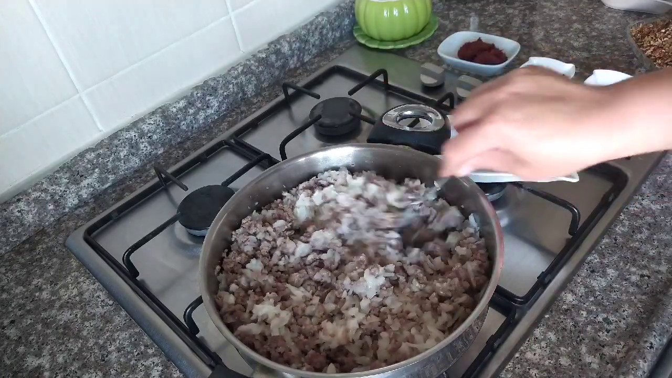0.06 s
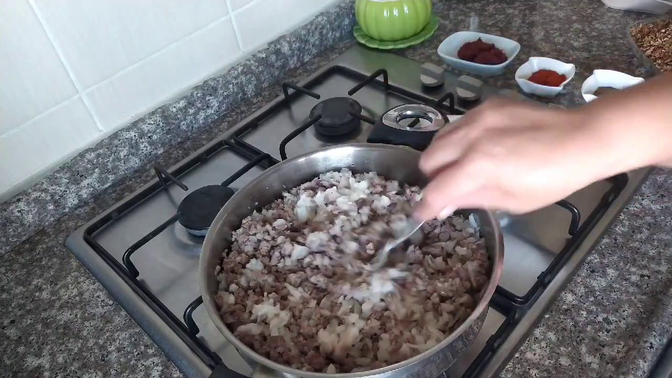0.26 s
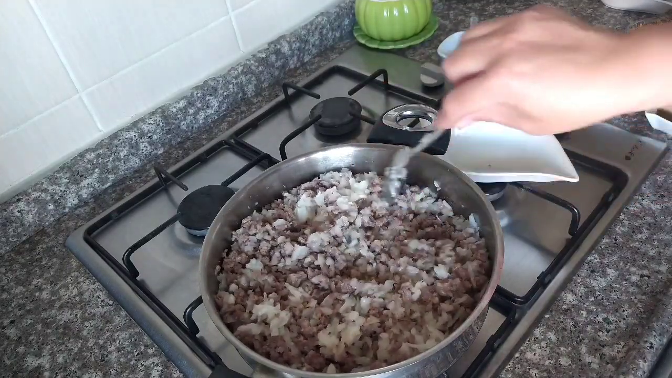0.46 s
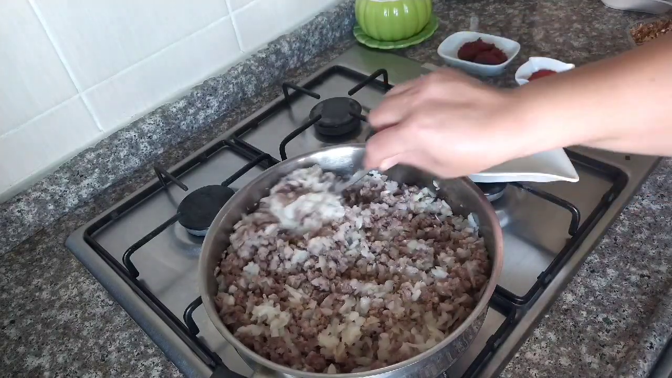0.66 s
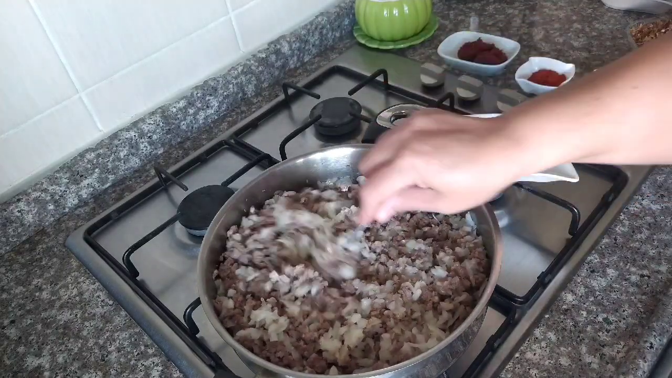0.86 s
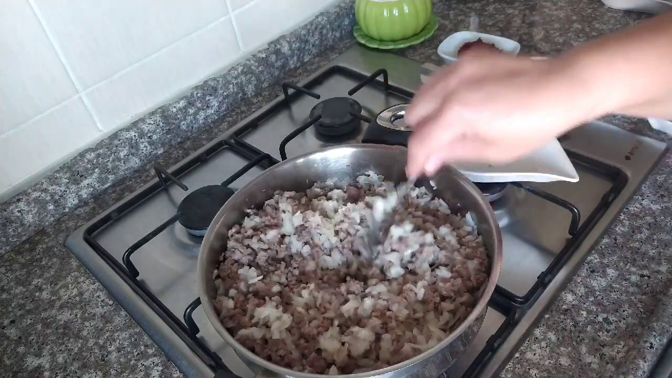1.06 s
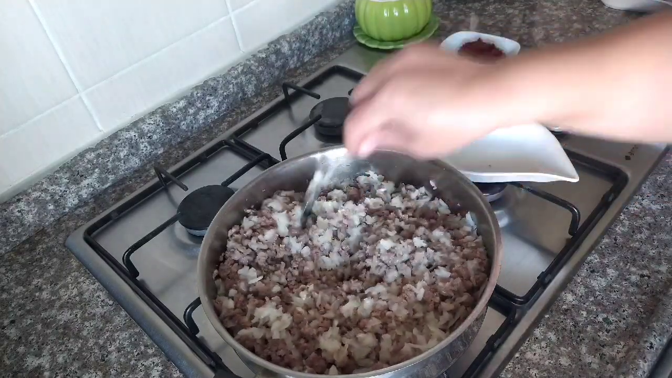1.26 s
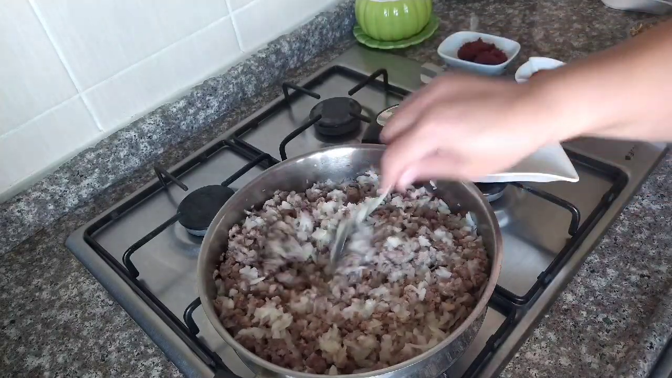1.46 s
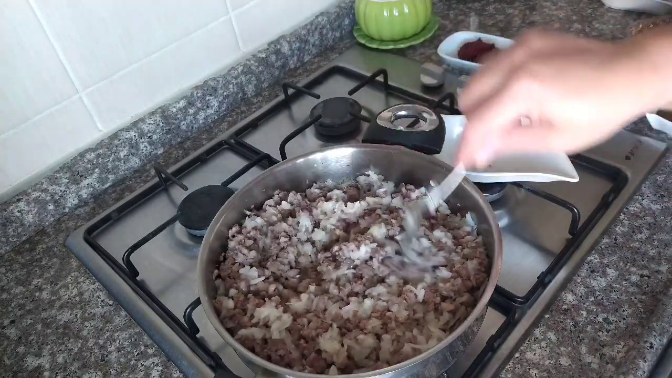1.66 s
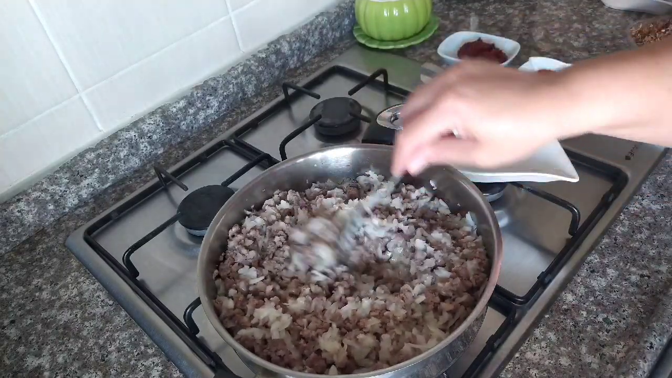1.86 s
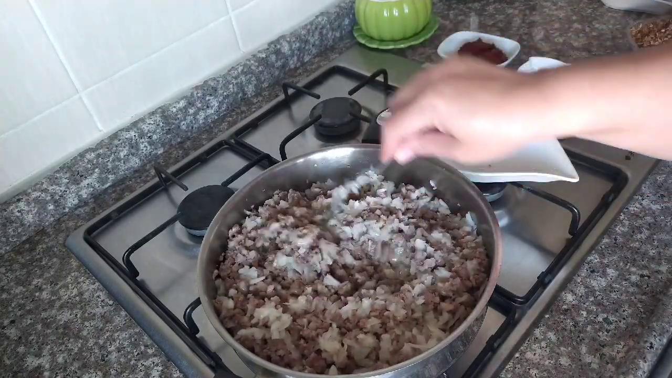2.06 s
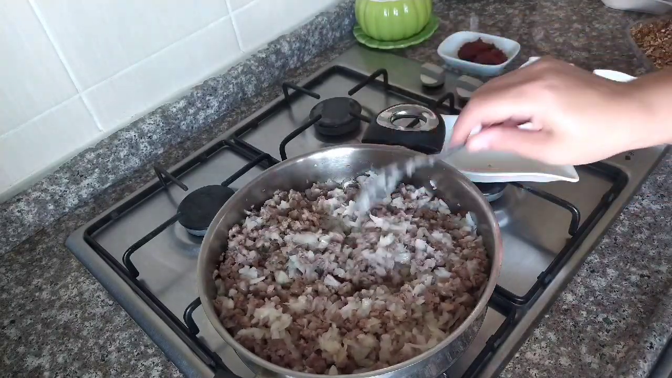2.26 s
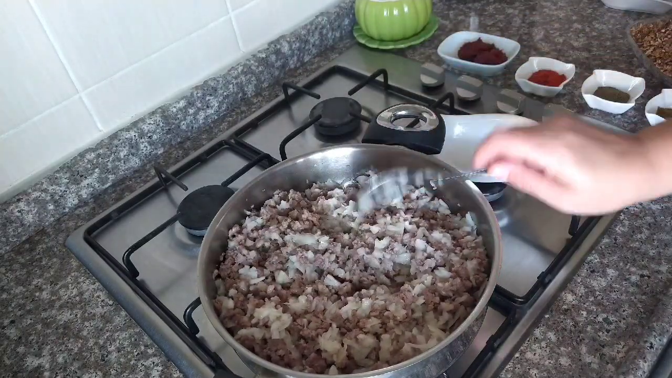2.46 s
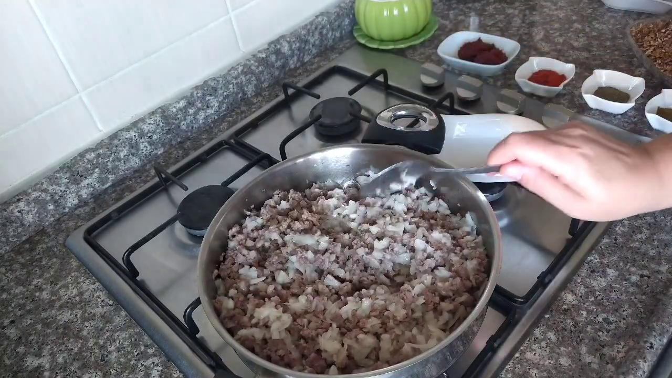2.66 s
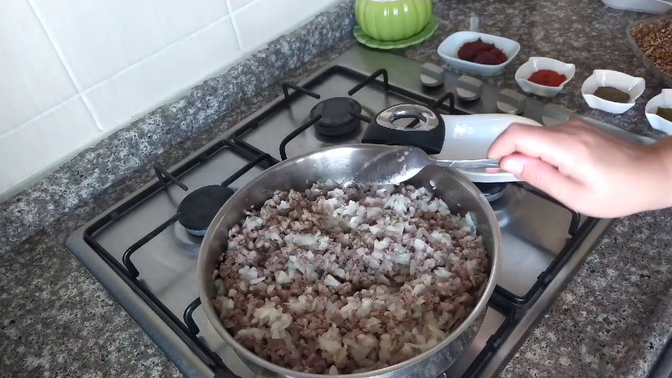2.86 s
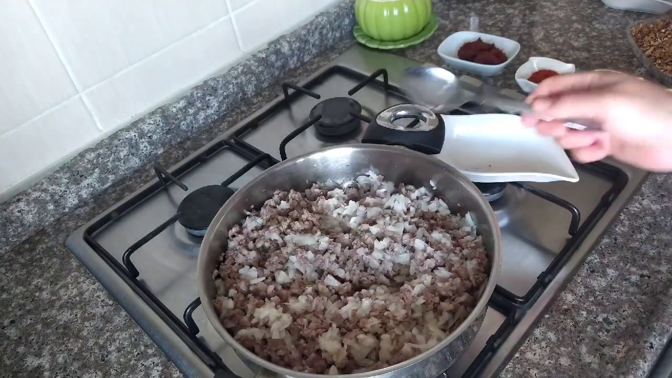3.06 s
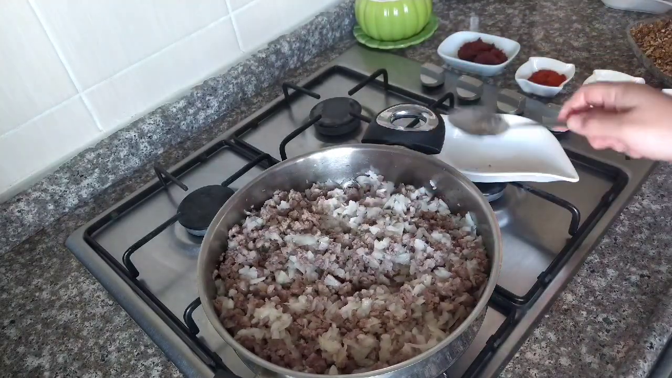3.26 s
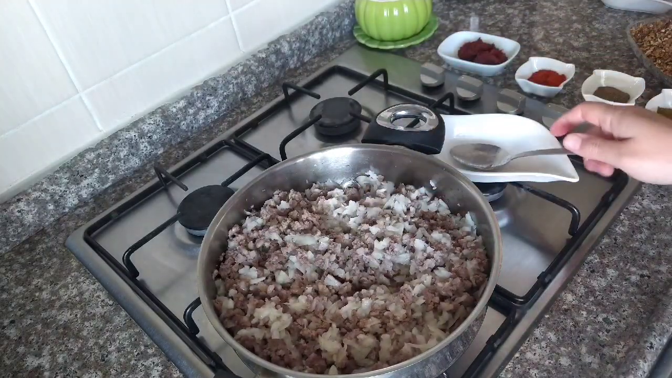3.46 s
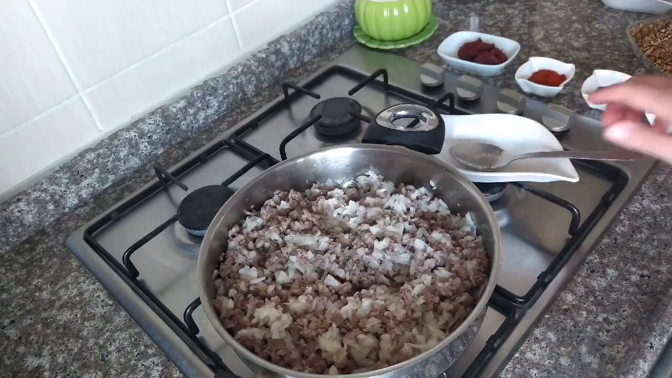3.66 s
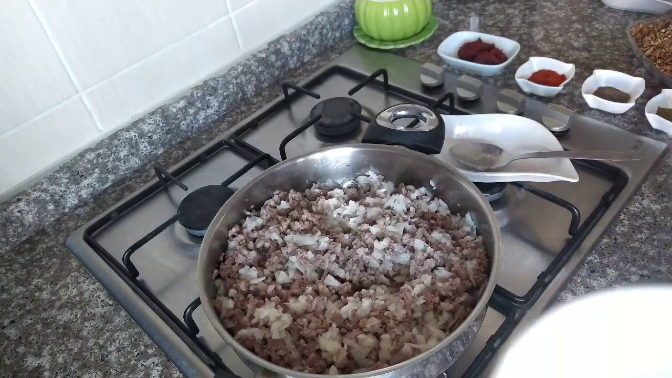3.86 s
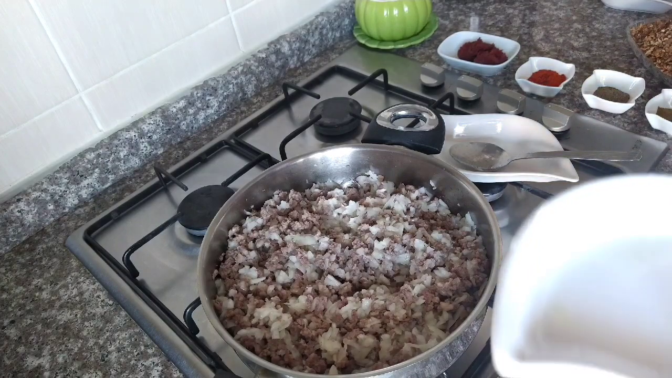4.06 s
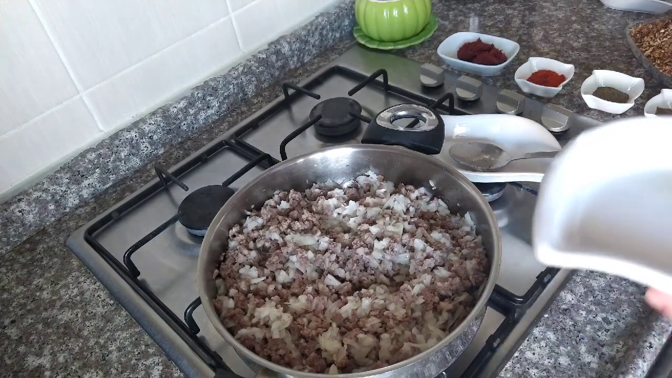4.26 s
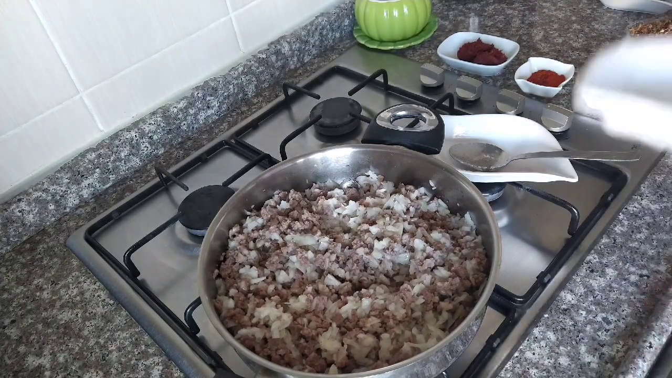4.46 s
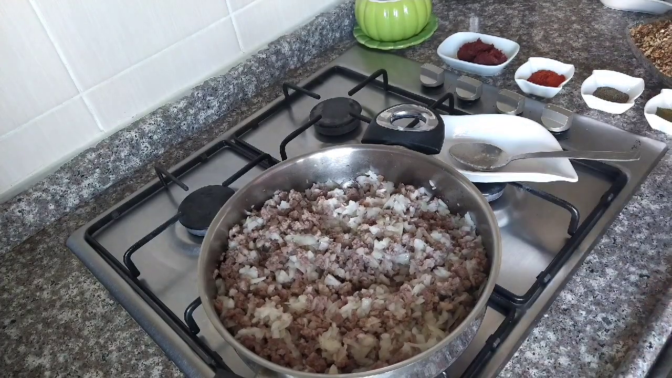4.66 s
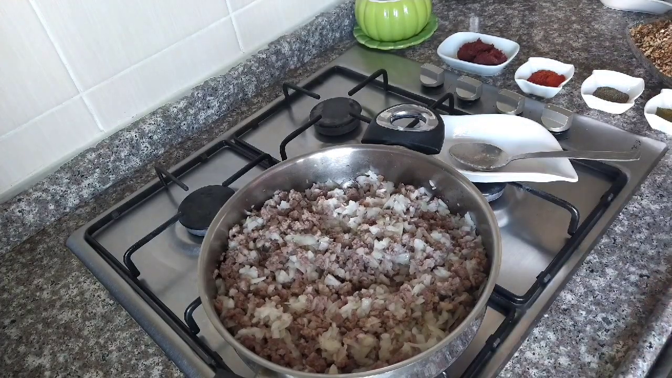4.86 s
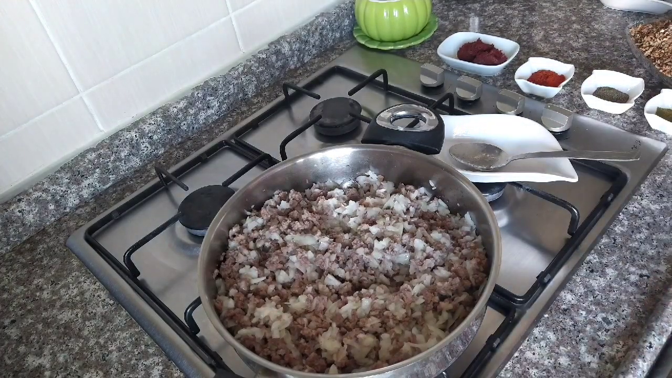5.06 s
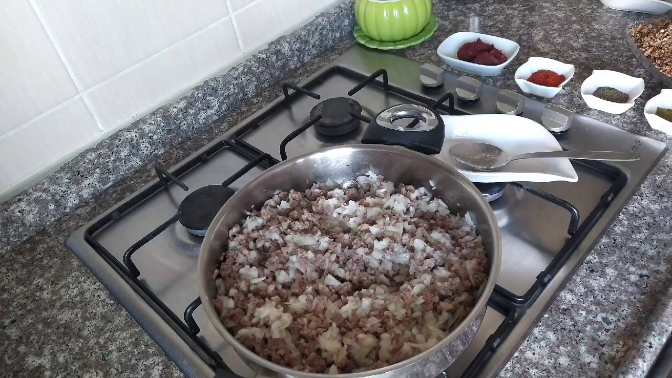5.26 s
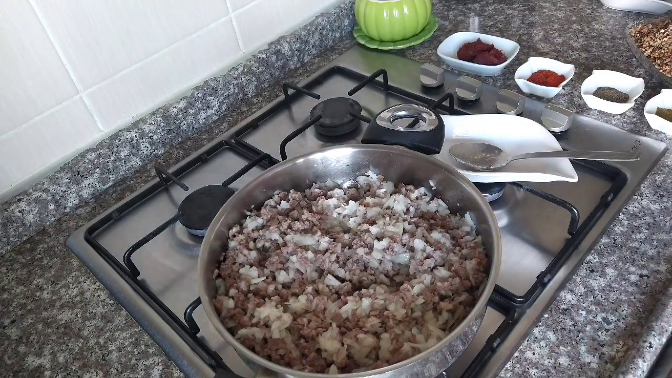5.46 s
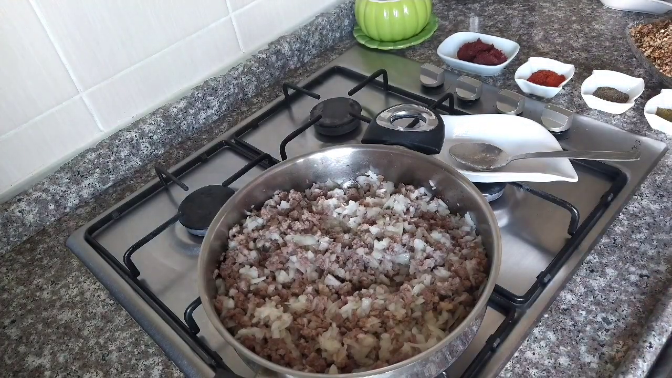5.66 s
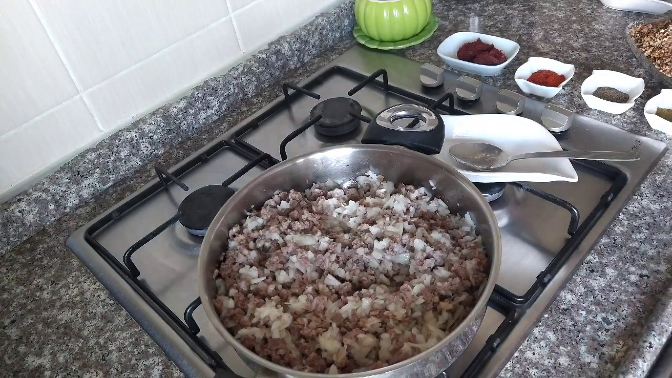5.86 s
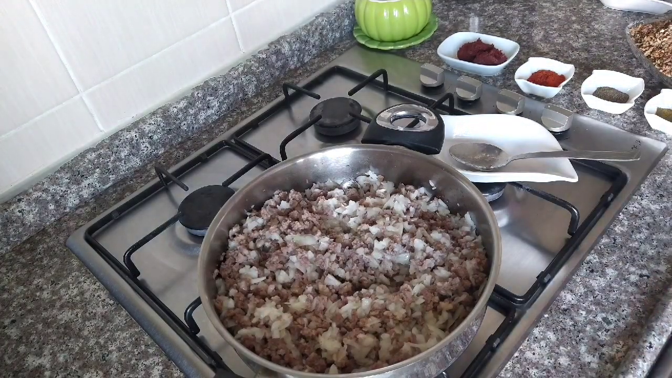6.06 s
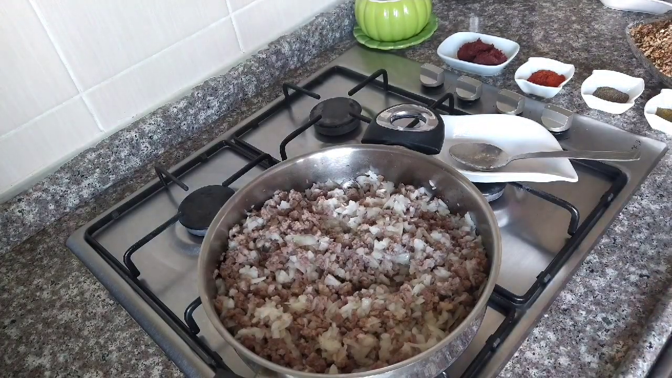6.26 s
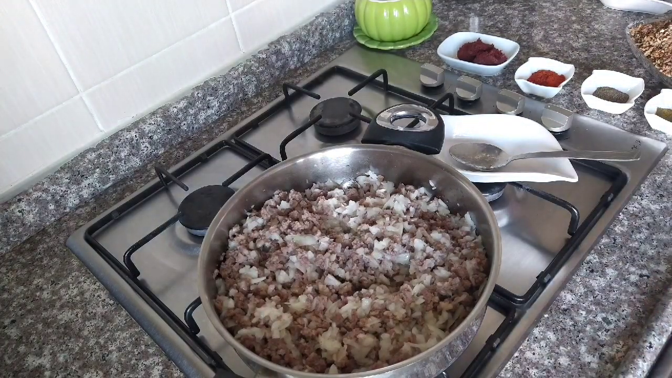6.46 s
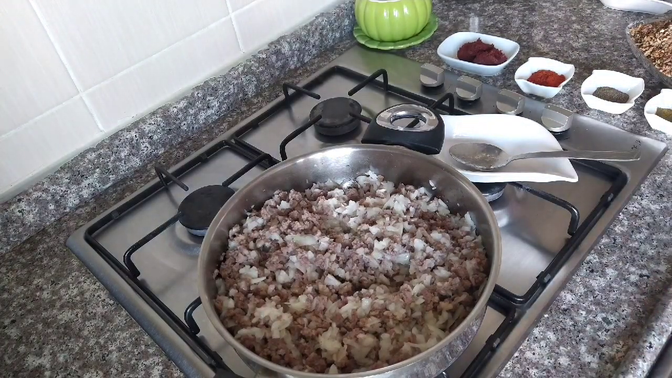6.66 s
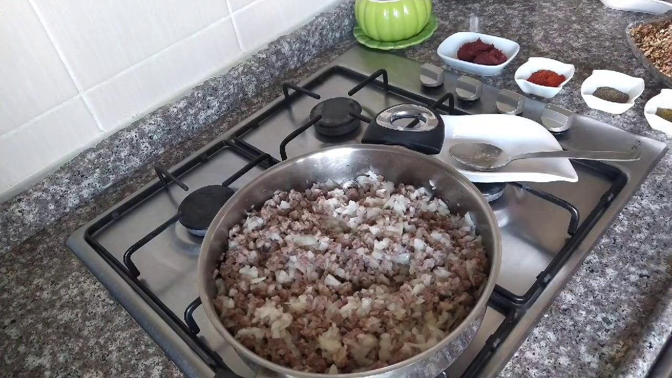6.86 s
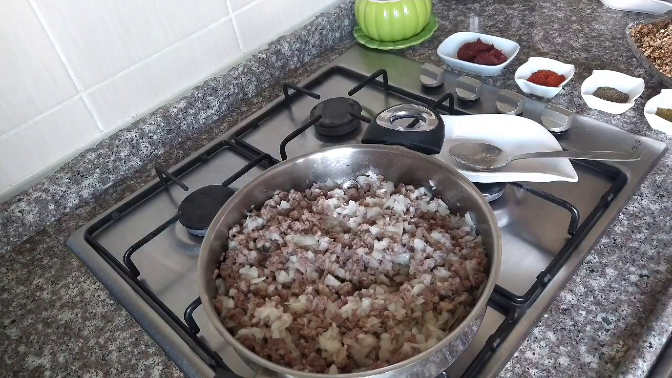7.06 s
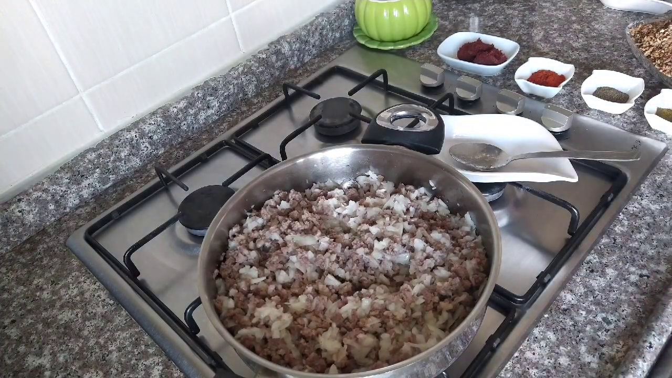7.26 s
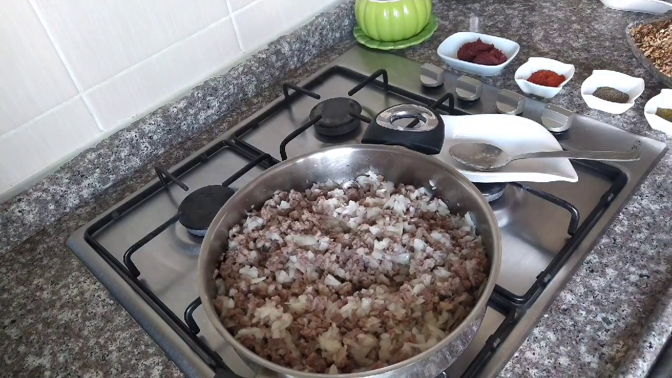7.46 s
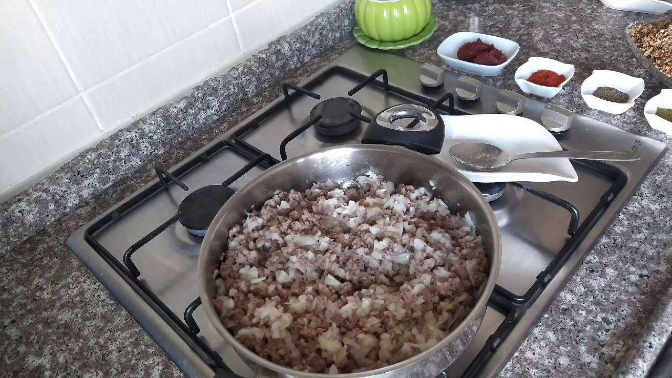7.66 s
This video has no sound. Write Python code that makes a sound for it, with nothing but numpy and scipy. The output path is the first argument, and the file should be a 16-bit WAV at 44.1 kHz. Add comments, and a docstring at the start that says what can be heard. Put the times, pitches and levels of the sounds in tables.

```python
"""A steel spoon knocks the wall of a frying pan as it stirs mince and onion, then is tapped clean on the
rim: steel clacks, the pan rings, the grate booms. The spoon is laid, bouncing, on a china rest.
Further off, a dish is set down on the stone counter and rocks before it settles.
Steam bubbles sizzle and crackle faintly in the fat over the rush of a gas flame and an appliance hum.
A small tiled kitchen echoes every blow."""
import sys
import numpy as np
from scipy import signal
from scipy.fft import rfft, irfft, next_fast_len
from scipy.io import wavfile
from scipy.ndimage import uniform_filter1d

SR = 44100
rng = np.random.default_rng(int(sys.argv[2]) if len(sys.argv) > 2 else 0)


def unload_wav(signal):
    """Save mono or channel-first audio to the path in sys.argv[1] as 16-bit WAV at rate SR, clipped to [-1, 1]."""
    wavfile.write(
        sys.argv[1],
        SR,
        np.round(np.clip(np.atleast_2d(signal).T, -1, 1) * 32767).astype(np.int16),
    )


N = 339862
T = np.arange(N) / SR
AGE = T[:SR]  # seconds since a blow


def undb(db):
    """Decibels to gain."""
    return 10 ** (np.asarray(db) / 20)


def on_log_axis(hz, points):
    """Interpolate (hz, value) points over log frequency."""
    point_hz, value = np.transpose(points)
    return np.interp(np.log(np.maximum(hz, 1)), np.log(point_hz), value)


def unit_rms(x):
    """Scale to rms 1."""
    return x / np.sqrt(np.mean(x ** 2))


def unit_blow(x):
    """Scale each channel to the energy of 10 ms at rms 1."""
    return x / np.sqrt(np.sum(x ** 2, axis=-1, keepdims=True) / (.01 * SR))


def colour(x, points, extra_db=lambda hz: 0):
    """Minimum-phase filter through (freq_hz, gain_db) points."""
    n = next_fast_len(x.shape[-1] // 2 + 4096) * 2
    hz = np.arange(n // 2 + 1) * SR / n
    cepstrum = irfft(np.log(undb(on_log_axis(hz, points) + extra_db(hz))))
    cepstrum[1:n // 2] *= 2
    cepstrum[n // 2 + 1:] = 0
    return irfft(rfft(x, n) * np.exp(rfft(cepstrum)))[..., :x.shape[-1]]


def fade(t60_s):
    """Exponential decay, 60 dB down at t60_s."""
    return undb(-60 * AGE / max(t60_s, 1e-3))


def stereo(mid, side):
    """Mid and side to left and right."""
    return mid + np.array([side, -side])


def noise(size, correlation=0):
    """Two channels of white noise."""
    mid, side = rng.standard_normal((2, size))
    return stereo(np.sqrt((1 + correlation) / 2) * mid, np.sqrt((1 - correlation) / 2) * side)


def drift(rate_hz):
    """Smooth random drift, rms 1."""
    hold = max(int(SR / rate_hz), 2)
    steps = np.repeat(rng.standard_normal(N // hold + 1), hold)
    return unit_rms(uniform_filter1d(uniform_filter1d(steps, hold), hold)[:N])


def grains(per_s, spread_db):
    """Random clicks, many small, a few large."""
    size = undb(spread_db * np.minimum(rng.exponential(size=N), 5))
    return noise(N) * size * (rng.random(N) < per_s / SR)


def add(track, start_s, sound):
    """Mix a sound in at start_s."""
    i = int(start_s * SR)
    track[:, i:i + sound.shape[1]] += sound[:, :N - i]


def ring(modes, scatter_db=-0.5, split_hz=9, detune=0.0027, waver_hz=0):
    """Damped modes in beating pairs, varied per blow; a chattering contact wavers their pitch."""
    out = 0
    for hz, db, t60_s in modes:
        hz = hz * (1 + detune * rng.uniform(-1, 1))
        pitch_scale = np.sqrt(hz / 2000)
        stereo_rad = min(hz / 1500, 1) * rng.uniform(.5, 1, (2, 1, 1)) * rng.choice([-1, 1])
        phase = rng.uniform(0, 2 * np.pi, (2, 1, 1)) + stereo_rad * np.array([[1], [-1]])
        waver = np.interp(AGE, np.linspace(0, 1, 120), rng.standard_normal(120))
        phase = phase + 2 * np.pi * waver_hz * pitch_scale * np.cumsum(waver) / SR
        twin_hz = hz + split_hz * pitch_scale * rng.uniform(.5, 1)
        pair = np.sin(2 * np.pi * hz * AGE + phase[0])
        pair += .5 * np.sin(2 * np.pi * twin_hz * AGE + phase[1])
        gain = undb(db + scatter_db * rng.standard_normal((2, 1))) * np.sqrt(t60_s)
        out = out + gain * unit_blow(fade(t60_s) * pair)
    return unit_blow(out)


def struck_at(modes, place):
    """Blend two columns of mode levels: place 0 is the first, 1 the second."""
    return [(hz, db0 + place * (db1 - db0), t60_s) for hz, db0, db1, t60_s in modes]


# Room decay: freq_hz, t60_s
ROOM_DECAY = [(150, 0.73), (800, 0.45), (2500, 0.46), (7000, 0.39), (13000, 0.34)]
def kitchen(dry, wet_db, build_s):
    """Direct sound plus diffuse tile echo; treble dies first, bass is near mono."""
    hz = np.arange(SR // 2 + 1) * SR / len(AGE)
    mid, side = rfft(noise(len(AGE)))
    spectrum = stereo(mid, side * np.minimum(hz / 800, 1))
    tail = 0
    for band_hz, t60_s in ROOM_DECAY:
        band = on_log_axis(hz, [(f, f == band_hz) for f, _ in ROOM_DECAY])
        tail = tail + irfft(spectrum * band) * fade(t60_s)
    tail *= 1 - np.exp(-(AGE / build_s) ** 2)
    tail /= np.sqrt(np.sum(tail ** 2, axis=1, keepdims=True))
    return dry + undb(wet_db) * signal.fftconvolve(dry, tail, axes=1)[:, :N]


# Motor tones: pitch_hz, level_db
HUM_TONES = [(102.3, -76), (303, -66.5), (408, -70), (457.6, -69)]
def appliance_hum(waver_rad=1.37):
    """A motor hums in faint, wavering tones."""
    return sum(undb(db) * np.sqrt(2) * np.sin(2 * np.pi * hz * T + waver_rad * drift(11))
               for hz, db in HUM_TONES)


# Burner spectrum: freq_hz, gain_db
FLAME_SPECTRUM = [(12, -61), (20, 2.5), (71, -8), (108, -0.5), (135, -11), (164, -6), (274, -10), (306, 1),
                  (382, -7), (456, -4.5), (621, -7), (726, -6), (1440, -4.5), (2010, -8), (4000, -13.5),
                  (5200, -28.5), (8800, -120)]
def gas_flame(level_db=-51, flutter_db=0.5):
    """The burner rushes softly, narrow in the bass."""
    mid, side = colour(noise(N), FLAME_SPECTRUM)
    side = colour(side, [(200, -11), (375, -8), (750, -1), (2000, -1)])
    return stereo(mid, side) / np.std(mid) * undb(level_db + flutter_db * drift(26))


# Bursting bubble spectrum: freq_hz, gain_db
BUBBLE_SPECTRUM = [(1760, -14), (3000, -11.5), (4600, -6.5), (4830, -5.5), (5630, -6), (7510, -1.5),
                   (10100, 3), (11700, -9), (14800, -15), (16000, -45)]
# Steam spurts: peak_s, width_s, level_db
STEAM_SPURTS = [(3.395, 0.028, -43.5), (4.008, 0.04, -44), (4.304, 0.039, -45), (4.85, 0.047, -45),
                (6.12, 0.12, -45), (7.522, 0.032, -45)]
def sizzle(start_db=-46, slope_db_per_s=-0.48, flicker_db=1.15):
    """Tiny steam bubbles burst in the fat, slowly calming; spurts swell and die."""
    bubbles = colour(grains(per_s=7000, spread_db=0.52), BUBBLE_SPECTRUM)
    bubbles = kitchen(bubbles, wet_db=0, build_s=0.0019)
    power = undb(start_db + slope_db_per_s * T) ** 2
    for peak_s, width_s, db in STEAM_SPURTS:
        power += undb(db) ** 2 * np.exp(-(2 * (T - peak_s) / width_s) ** 2)
    return unit_rms(bubbles) * np.sqrt(power) * undb(flicker_db * drift(40))


# Large bubbles: start_s, level_db
FAT_POPS = [(3.7727, -46), (3.847, -44.5), (4.0122, -52), (4.283, -54), (4.8286, -42.5), (5.2114, -50),
            (5.301, -47), (6.0004, -50)]
def crackle(snaps_db=-56, pop_t60_s=0.016):
    """Fat snaps sparsely; a few larger bubbles pop."""
    snaps = unit_rms(colour(grains(per_s=160, spread_db=1.4), BUBBLE_SPECTRUM)) * undb(snaps_db)
    for start_s, db in FAT_POPS:
        pop = colour(noise(len(AGE)) * fade(pop_t60_s), BUBBLE_SPECTRUM)
        add(snaps, start_s, undb(db) * unit_blow(pop))
    return kitchen(snaps, wet_db=2.5, build_s=0.0021)


# Dish contacts: start_s, level_db, cutoff_hz, ring_db, flatness (0 edge, 1 flat)
DISH_CONTACTS = [(6.287, -26, 1160, -4, 0), (6.5410, -18, 4670, 8.5, 0.19), (6.558, -18, 2580, 4, 0.36),
                 (6.580, -24.5, 1900, 5, 0), (6.622, -24, 1890, 11, 0.02), (6.640, -26, 1800, -4, 0),
                 (6.666, -32.5, 1670, -16, 0), (6.8477, -16, 6860, 7.5, 1), (6.857, -18.5, 5150, 3, 1)]
# Dish modes: pitch_hz, edge_db, flat_db, t60_s
DISH_MODES = [(173, -25, -10, 0.25), (354.7, 0, -28, 0.25), (663, 0, -26, 0.12), (1010, -2, -20, 0.23),
              (1082, 0, -17, 0.21), (1150, -1, -13, 0.17), (1300, -2, -4, 0.21), (1420, -5, -3, .18),
              (1638, -14, 0, 0.12), (1748, 10, -8, 0.071), (1857, 15, -17, 0.085), (1912, 16.5, -12, 0.15),
              (1960, 6, 3, 0.1), (2080, -5, -5, 0.15), (2410, 4.5, 9, 0.17), (3030, -1, 9, 0.1),
              (3055, -2, 10, 0.12), (3170, 6, 4, 0.12), (3470, -15, -4, 0.11), (3790, -2.5, -5, 0.27),
              (4540, -25, 2, 0.11), (4610, -13, -6, 0.14), (5045, -5, -2, 0.12), (5330, -11, 2, 0.08),
              (5870, 1, 1, 0.086), (6400, -22, -1.5, 0.16), (7000, -9, -1, 0.15), (8400, -8, 0, 0.28),
              (9120, 5, 7, 0.093), (10200, 4, 3, 0.1), (11000, -5, -2, 0.12)]
# Counter thud spectrum: freq_hz, gain_db
COUNTER_SPECTRUM = [(50, -23), (150, -2), (320, -3.5), (500, 2.5), (800, 1), (1300, -0.5), (2200, 2.5),
                    (3000, -6.5), (4300, -15.5), (7000, -14), (10500, -8), (12500, -41)]
def dish_on_counter(contact_s=0.0067, shudder_db=-10, shudder_t60_s=0.19):
    """The dish touches, rocks and drops flat; the counter shudders. Soft contacts sound dull."""
    thuds, rings = np.zeros((2, 2, N))
    force = np.exp(-(AGE / contact_s) ** 2) + undb(shudder_db) * fade(shudder_t60_s)
    force *= 1 - fade(0.0087)
    for start_s, db, cutoff_hz, ring_db, flatness in DISH_CONTACTS:
        lowpass_db = lambda hz: -10 * np.log10(1 + (hz / cutoff_hz) ** 4)
        mid, side = colour(noise(len(AGE)) * force, COUNTER_SPECTRUM, lowpass_db)
        side = colour(side, [(300, -15), (600, 1)])
        add(thuds, start_s, undb(db) * unit_blow(stereo(mid, side)))
        modes = [(hz, mode_db + lowpass_db(hz), t60_s)
                 for hz, mode_db, t60_s in struck_at(DISH_MODES, flatness)]
        ringing = ring(modes, split_hz=13.6, detune=0.0039, waver_hz=18) * (1 - fade(.03))
        add(rings, start_s, undb(db + ring_db) * ringing)
    return kitchen(thuds, wet_db=-0.18, build_s=0.0037) + kitchen(rings, wet_db=-6, build_s=0.015)


# Modes of the pan on its grate and steel hob: pitch_hz, level_db, t60_s
GRATE_MODES = [(45.3, -8, 0.13), (75.4, -22, 0.085), (148, -14, 0.089), (206.7, -9, 0.37),
               (316, 12.5, 0.075), (331, 5.5, 0.11), (413, -2, 0.09), (699, 8, 0.13)]
# Loose pan support spectrum: freq_hz, gain_db
RATTLE_SPECTRUM = [(25, -1.5), (60, 3.5), (130, -3), (330, -4.5), (520, -4.5), (620, -21), (850, -7),
                   (1500, -19), (4000, -53)]
def grate_shake(rise_t60_s=0.12, rattle_db=-6.5, rattle_t60_s=0.28):
    """Grate and hob boom just after a blow; the pan rattles on its supports."""
    rattle = noise(len(AGE), correlation=0.98) * fade(rattle_t60_s)
    rattle = unit_blow(colour(rattle, RATTLE_SPECTRUM))
    return (ring(GRATE_MODES, detune=0.018) + undb(rattle_db) * rattle) * (1 - fade(rise_t60_s))


# Steel contact spectrum: freq_hz, wall_db, rim_db
CLACK_SPECTRUM = [(100, -35, -53), (517, -20, -21), (816, 0, -8), (1130, -11, 3.5), (1430, -3.5, 4),
                  (1800, -5, 0.5), (2160, 1.5, -0.5), (2800, -1.5, -6.5), (3660, 0.5, -10.5),
                  (5100, -3, -4.5), (5500, -4, 3.5), (5750, -3, -5), (6400, 2, 4), (7140, -1.5, -1),
                  (8400, 4.5, 3), (9400, 1, 3.5), (10600, 0, 4), (11540, -15, -6), (15100, -30, -14)]
def steel_clack(force, place, tilt_db_per_oct):
    """A steel contact: full on the wall (place 0), hollow on the rim (place 1)."""
    points = [(hz, wall_db + place * (rim_db - wall_db)) for hz, wall_db, rim_db in CLACK_SPECTRUM]
    tilt_db = lambda hz: tilt_db_per_oct * np.log2(np.maximum(hz, 500) / 4000)
    return unit_blow(colour(force, points, tilt_db))


# Bounces on the rest: start_s, level_db
SPOON_BOUNCES = [(3.503, -24), (3.5082, -20), (3.516, -26), (3.523, -22), (3.536, -27)]
# Modes of the free spoon and rest: pitch_hz, level_db, t60_s
SPOON_MODES = [(1552, -12, 0.083), (2776, 1, 0.055), (2823, 1, 0.047), (3140, -6.5, 0.065),
               (3810, -7, 0.11), (4517, 1, 0.054), (4800, -4, 0.076), (5790, -5, 0.086), (6665, -11, 0.05),
               (7230, 2.5, 0.08), (7260, -2, 0.052), (7730, 0, 0.1), (8144, -4, 0.09), (8900, -3, 0.085),
               (9460, -1.5, 0.16), (9950, -6, .1), (10200, -2, 0.098), (10570, 3, 0.083),
               (11200, -6, 0.083), (12500, -11, 0.09)]
def spoon_on_rest(tick_db=-8, tick_t60_s=0.082, bump_db=-18):
    """The spoon bounces on china, each contact shifting its pitches; the hob bumps softly."""
    out = np.zeros((2, N))
    for start_s, db in SPOON_BOUNCES:
        tick = steel_clack(noise(len(AGE)) * fade(tick_t60_s), place=0.82, tilt_db_per_oct=2)
        ringing = ring(SPOON_MODES, split_hz=21, detune=0.0064, waver_hz=18)
        add(out, start_s, undb(db) * (ringing + undb(tick_db) * tick + undb(bump_db) * grate_shake()))
    return kitchen(out, wet_db=-6.5, build_s=0.01)


# Pan and spoon modes: pitch_hz, wall_db, rim_db, t60_s
PAN_MODES = [(1220, -22, -3.5, 0.27), (1777, -15, 10, 0.058), (1890, -16, 8, 0.045), (2024, 0, 0.5, 0.16),
             (2443, 0, -2, 0.15), (2870, 0.5, -3.5, 0.22), (3680, 3, -15, .08), (3984, 8, -19, 0.065),
             (4120, -8, -2, 0.21), (4704, -14, 4, 0.21), (5010, 17, -32, 0.037), (5540, -10, 14, 0.058),
             (6100, 10.5, -8, 0.1), (6360, 4, 10.5, 0.083), (6800, 2, 9, 0.053), (7600, 6, 6, 0.12),
             (8350, -8, 13.5, 0.086), (8900, 8, 16, 0.053), (9000, 9, 14, 0.056), (8860, -2, 10, 0.092),
             (9460, 9, 12, 0.081)]
def pan_ring(place, scatter_db=-0.5):
    """Pan and spoon ring briefly, damped by food and hand."""
    return ring(struck_at(PAN_MODES, place), scatter_db)


def push(start_s, length_s, t60_s, attack_s=0.0075):
    """Envelope of one push: the spoon speeds up, holds and slows."""
    attack = np.clip((T - start_s) / attack_s, 0, 1)
    return attack * undb(-60 * np.maximum(T - start_s - length_s, 0) / t60_s)


# Spoon pushes: start_s, length_s, level_db, bite (0 food, 1 steel), release_t60_s
STIR_STROKES = [(-.02, 0.017, -30, 0.2, 0.51), (0.557, 0.18, -36.5, 0.02, .4),
                (0.724, .02, -34.5, 0.8, 0.16), (0.744, 0.094, -37, 0.84, .04),
                (0.808, 0.051, -31.5, 0.7, .02), (1.199, 0.013, -41.5, 0, 0.12),
                (1.282, 0.02, -31, 0.92, 0.04)]
# Wet mince spectrum: freq_hz, gain_db
MINCE_SPECTRUM = [(300, -15.5), (1500, -4.5), (3000, -5), (6000, -4.5), (9500, 2.5), (11000, -4.5),
                  (12200, -14), (15000, -18)]
# Steel scrape spectrum: freq_hz, gain_db
SCRAPE_SPECTRUM = [(200, -15), (800, -14.5), (1500, 2), (2200, 0), (2800, 3), (4200, -5), (5000, -6),
                   (5600, -15), (6700, -8), (9500, -13.5), (11000, -6), (12200, -18), (15000, -32)]
def stirring(turning_db=-54.5, turning_db_per_s=-0.5, lift_s=2.08, jerk_db=1.7, ring_db=-10):
    """Wet food rustles; the spoon slips on the pan floor, catches on grit and makes the pan sing."""
    moves = [(undb(db) * push(start_s, length_s, t60_s), bite)
             for start_s, length_s, db, bite, t60_s in STIR_STROKES]
    # light scraping between pushes, until the spoon lifts out
    turning = undb(turning_db + turning_db_per_s * T) * push(0, lift_s, t60_s=0.55)
    moves.append((turning, 1))
    food_level = np.sqrt(sum(level ** 2 * (1 - bite) for level, bite in moves))
    steel_level = np.sqrt(sum(level ** 2 * bite for level, bite in moves))
    rustle = unit_rms(colour(grains(per_s=7000, spread_db=0.98), MINCE_SPECTRUM)) * food_level
    slips = unit_rms(grains(per_s=5000, spread_db=1.2))
    grit = unit_rms(grains(per_s=300, spread_db=1.4))
    friction = (slips + grit) * undb(jerk_db * drift(260))
    scrape = unit_rms(colour(friction, SCRAPE_SPECTRUM)) * steel_level
    singing = signal.fftconvolve(scrape, pan_ring(place=0), axes=1)[:, :N]
    singing = undb(ring_db) * np.std(scrape) * unit_rms(singing)
    return kitchen(rustle + scrape + singing, wet_db=-3.5, build_s=0.0017)


# Spoon knocks on the pan, and one faint crackle of frying at 1.13 s:
# start_s, level_db, contact_s, tilt_db_per_oct, ring_db, shake_db, place (0 wall, 1 rim)
PAN_TRANSIENTS = [(0.5309, -13.5, 0.0038, -1.84, -4.5, -22, 0.012), (0.746, -39, .004, -7, -6, -27, 0.55),
                  (1.134, -44, 0.00091, 0, -16, -30, 0), (1.2667, -14, 0.0048, 1, -3.5, -32, 0.25),
                  (1.2702, -19, 0.0034, 1, -4, -24, 0.044), (1.294, -28.5, 0.0065, -2.5, -3.5, -30, 0),
                  (2.4145, -12.5, 0.0065, 0, 0, -10, 0.98), (2.5600, -15, 0.008, 0, -2.5, -8, 0.98),
                  (2.6914, -16.5, 0.012, 0.3, -4.5, -10.5, 0.86)]
def pan_transients(chatter_db=1.0, glance_db=-11.5, glance_t60_s=0.13, rise_t60_s=0.0085):
    """Spoon knocks and one frying crackle: short bursts ring the pan; rim taps shake the grate most."""
    clacks, rings, booms = np.zeros((3, 2, N))
    for start_s, db, contact_s, tilt_db_per_oct, ring_db, shake_db, place in PAN_TRANSIENTS:
        chatter = noise(len(AGE), correlation=0.033) * undb(chatter_db * rng.standard_normal(len(AGE)))
        # the contact, then glances off pan wall and hob
        force = np.exp(-(AGE / contact_s) ** 2) + undb(glance_db) * fade(glance_t60_s)
        force *= 1 - fade(rise_t60_s)
        add(clacks, start_s, undb(db) * steel_clack(chatter * force, place, tilt_db_per_oct))
        add(rings, start_s, undb(db + ring_db) * pan_ring(place, scatter_db=-1))
        add(booms, start_s, undb(db + shake_db) * grate_shake())
    return (kitchen(clacks, wet_db=-7.5, build_s=0.012)
            + kitchen(rings, wet_db=-12.5, build_s=0.028)
            + kitchen(booms, wet_db=-1.4, build_s=0.0072))


def scene():
    """Clatter and stirring over frying, flame and hum."""
    clatter = pan_transients() + spoon_on_rest() + dish_on_counter()
    return clatter + stirring() + sizzle() + crackle() + gas_flame() + appliance_hum()


def record(dry):
    """Limit to full scale, then low-pass at 15.7 kHz."""
    lowpass = signal.ellip(8, .2, 80, 15700, fs=SR, output="sos")
    return signal.sosfilt(lowpass, np.clip(dry, -1, 1))


dry = scene()
out = record(dry)
unload_wav(out)
```